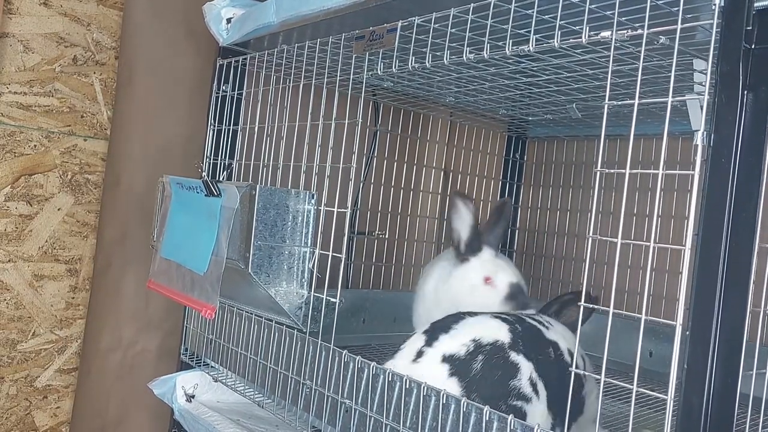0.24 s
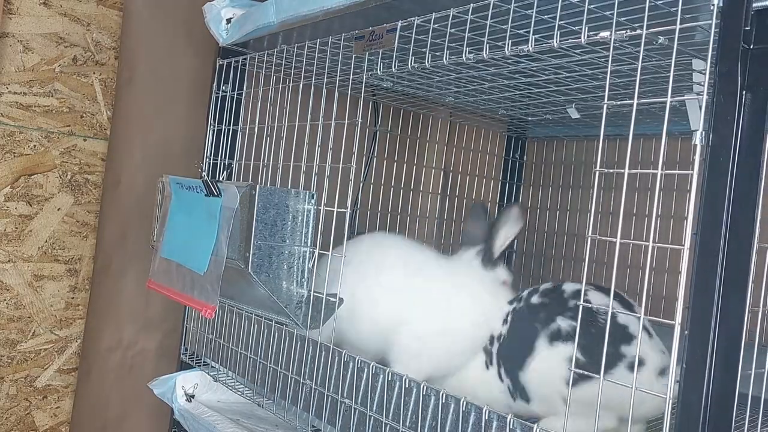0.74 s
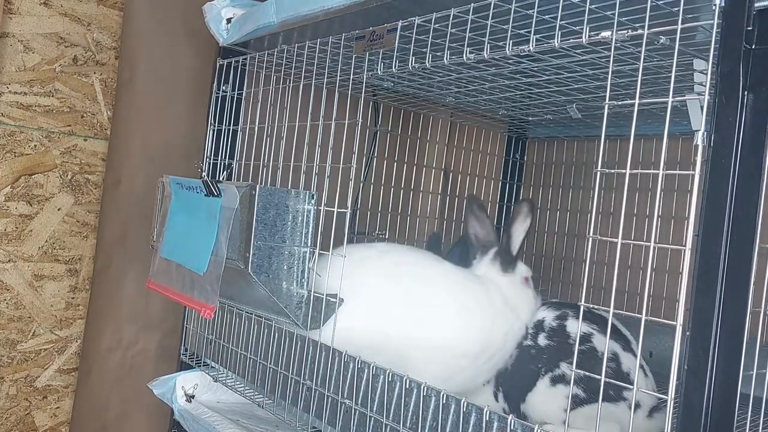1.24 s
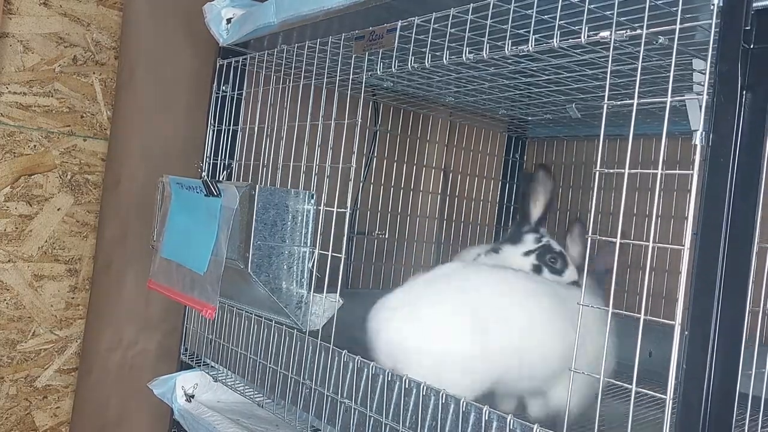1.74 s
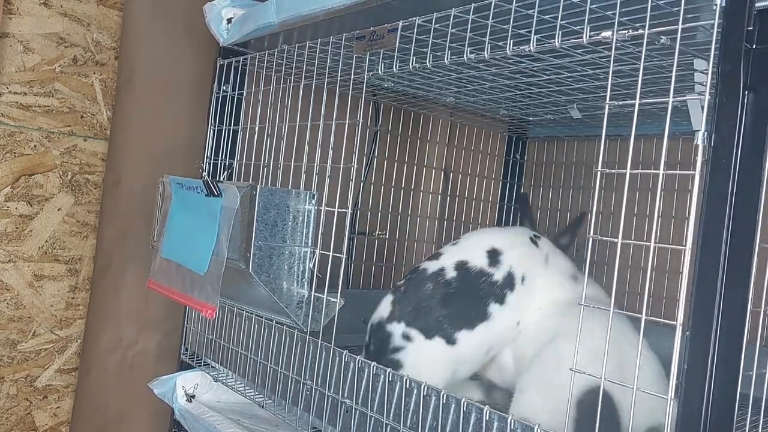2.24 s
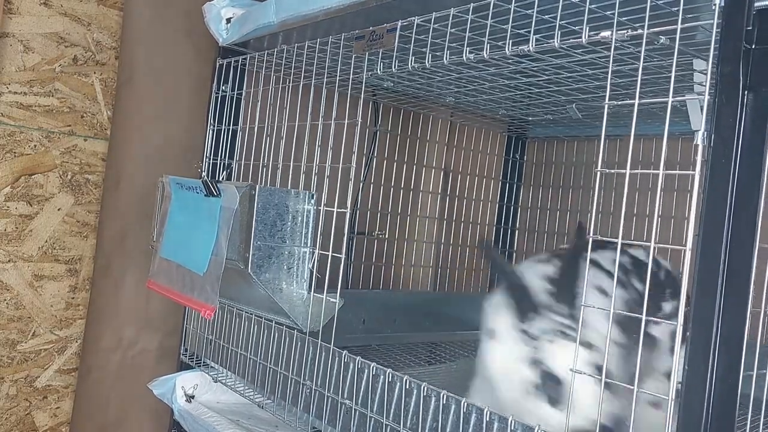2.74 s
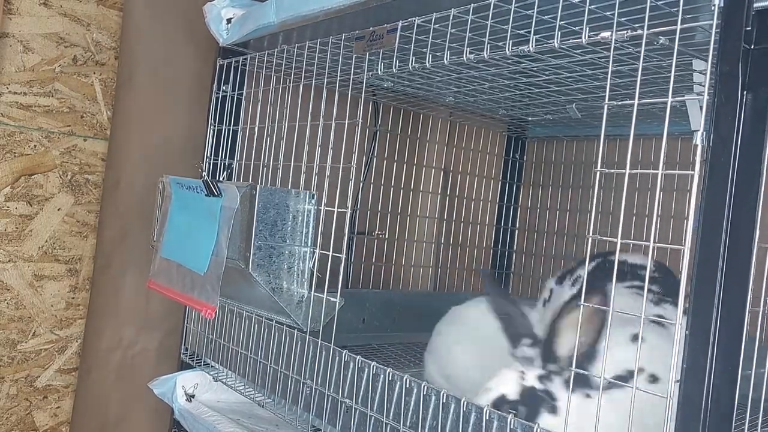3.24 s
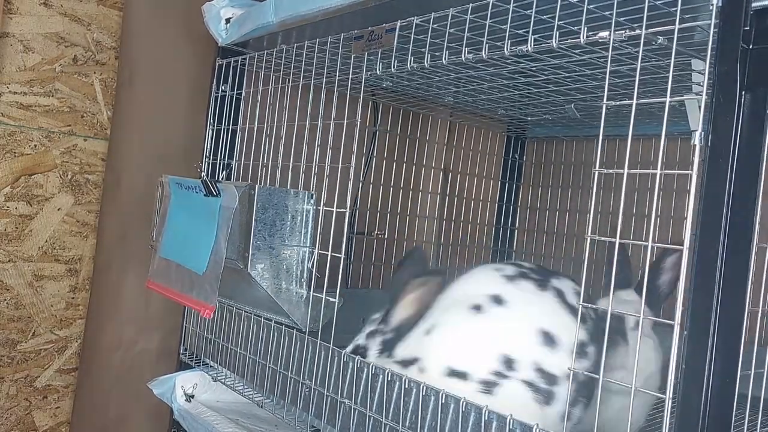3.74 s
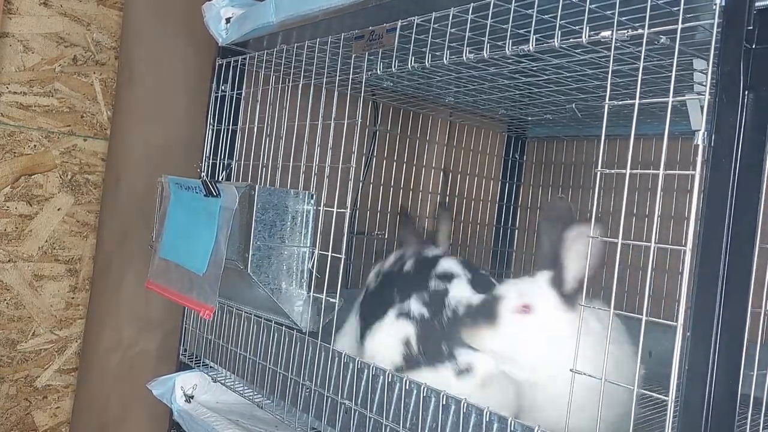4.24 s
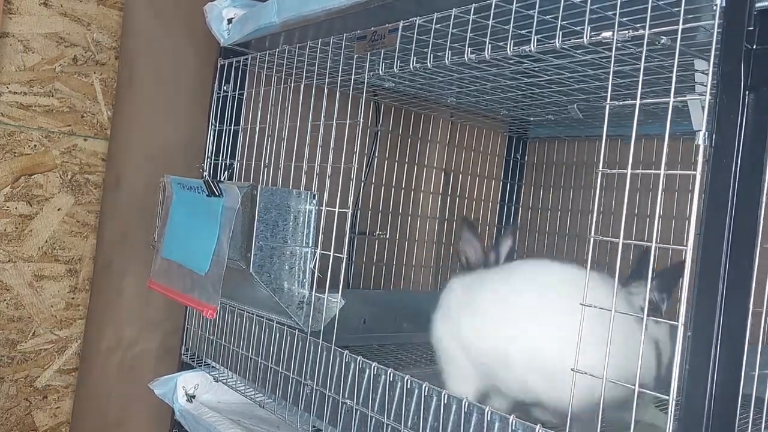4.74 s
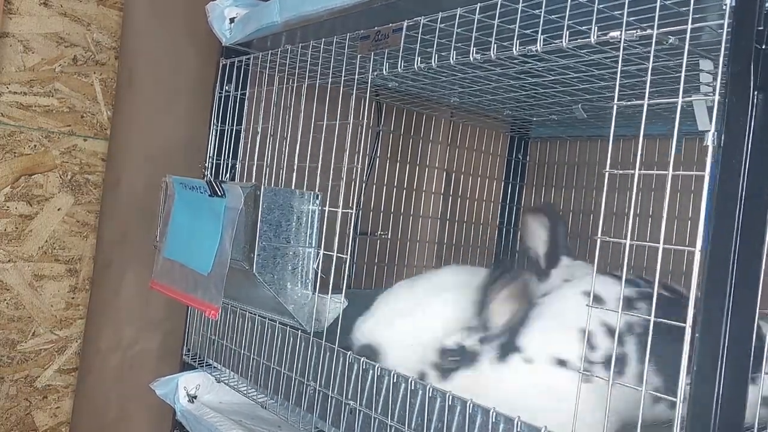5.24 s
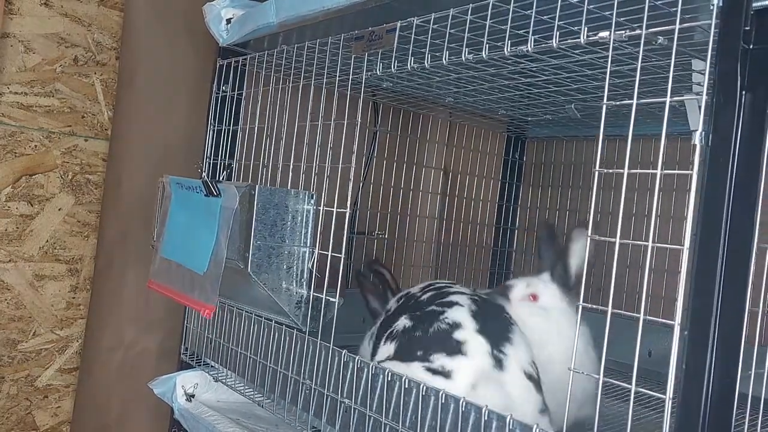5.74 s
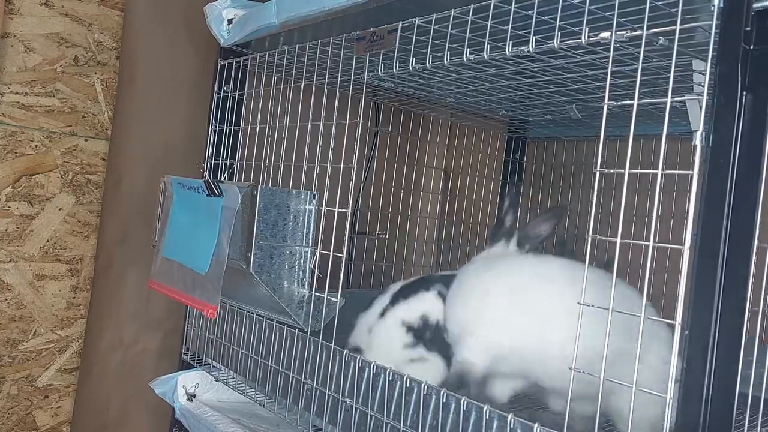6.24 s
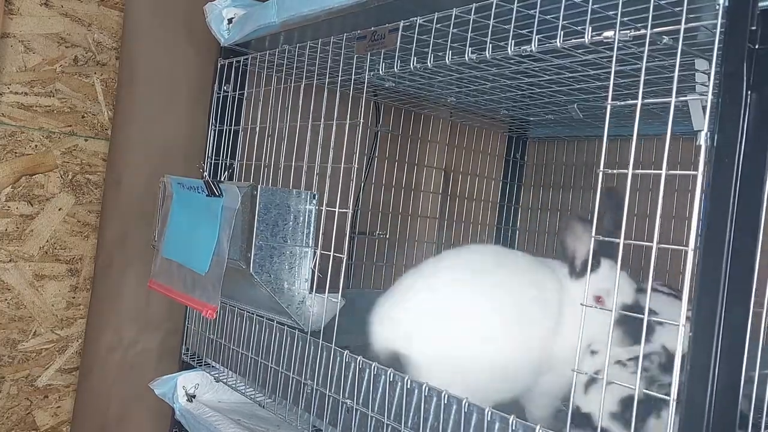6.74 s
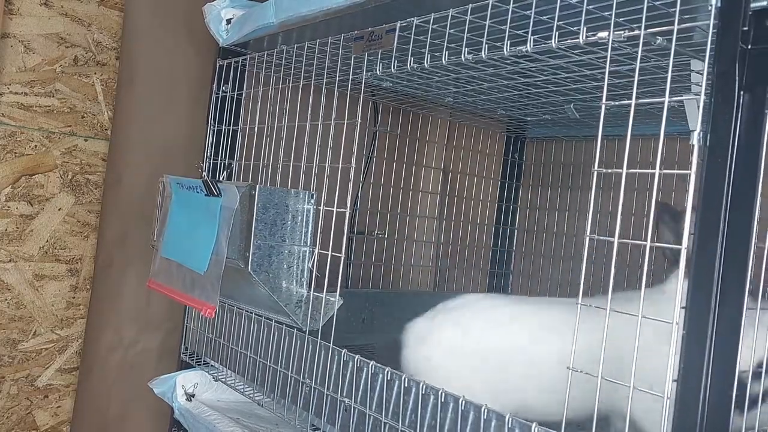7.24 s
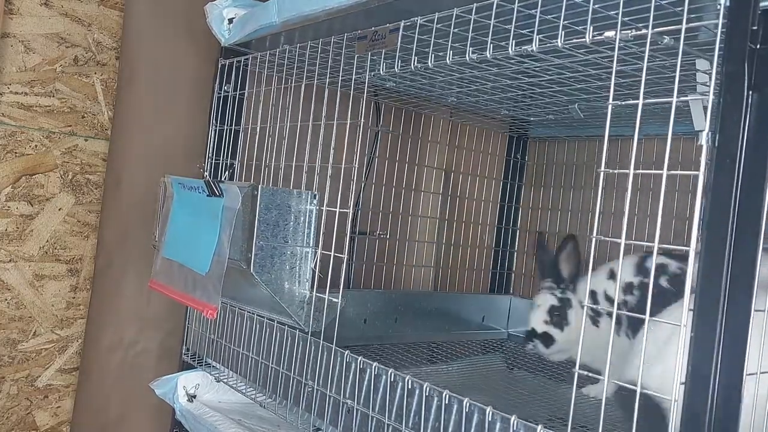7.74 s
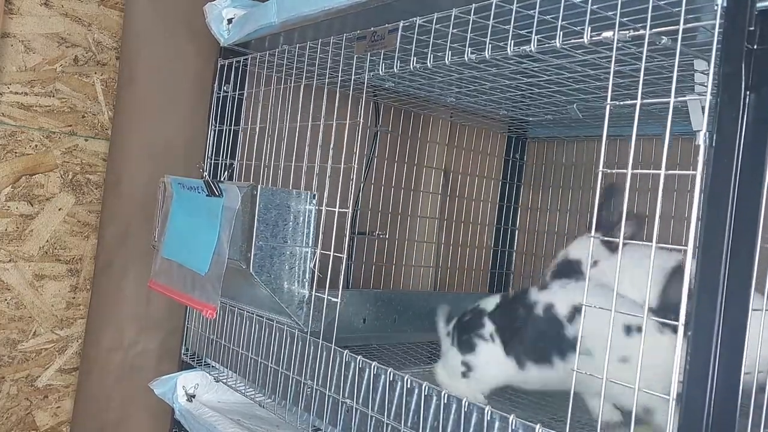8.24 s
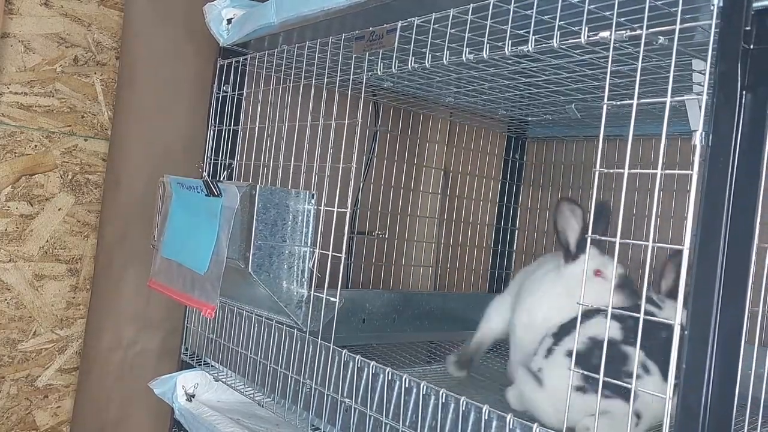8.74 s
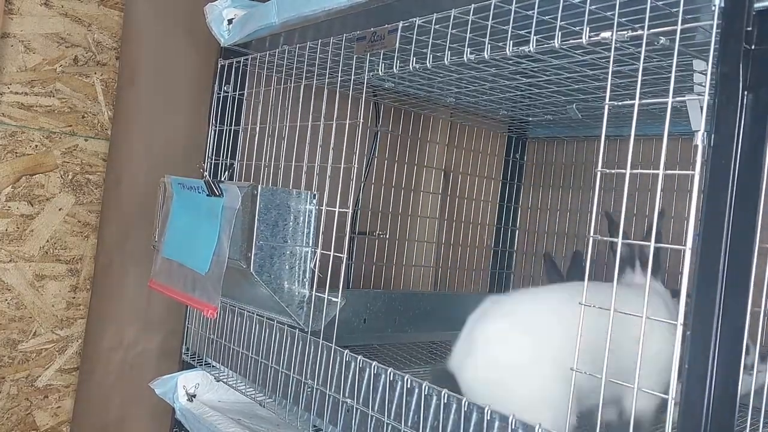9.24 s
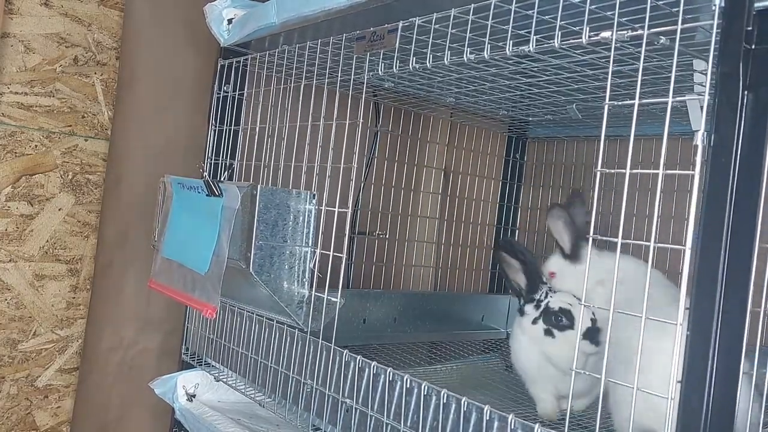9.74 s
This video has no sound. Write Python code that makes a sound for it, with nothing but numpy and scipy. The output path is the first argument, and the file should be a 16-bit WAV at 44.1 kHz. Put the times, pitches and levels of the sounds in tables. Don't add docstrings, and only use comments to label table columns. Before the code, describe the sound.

Two rabbits scuffle in a wire-mesh cage in a wooden shed, picked up close in stereo with short, dull reflections. It opens almost quiet, with faint mains hum, soft air and small knocks near 0.3 s. A bright burst of claw clicks and shaking mesh breaks out at 0.65 s, then more from 1.45 to 2.1 s and a sharp kick at 2.55 s, trailing into lighter rattles around 3 s. From 3.2 to 4.4 s only weaker scrabbles remain. At 4.5 s the chase turns dense, nearly continuous until 6.6 s, with strong jolts at 5.4, 5.65 and 6.45 s and hollow paw booms and tray clatter beneath. It thins near 7 to 7.4 s, snaps back at 7.5 s, knocks and drums around 8.2 to 8.5 s, then rattles on, with crisp bursts at 9.2 and 9.7 s before easing.

```python
import sys
import numpy as np
from scipy import signal
from scipy.fft import rfft, irfft, next_fast_len
from scipy.io import wavfile
from scipy.ndimage import uniform_filter1d

SR = 44100
rng = np.random.default_rng(int(sys.argv[2]) if len(sys.argv) > 2 else 0)


def store_pcm(level_fs):
    pcm = np.round(np.clip(level_fs, -1, 1) * 32767).astype(np.int16)
    wavfile.write(sys.argv[1], SR, np.atleast_2d(pcm).T)


def boost_factor(decibels):
    exponent = np.asarray(decibels, float) / 20
    return 10 ** exponent


N = 440559
SIZE = next_fast_len(N + SR // 2)
HZ = np.maximum(np.arange(SIZE // 2 + 1) * SR / SIZE, 1)

# peak in seconds, claw shower in dB, build-up in seconds, die-away in seconds,
# panel shake in dB above the claws.
CIRCLING = [(0.359, -52, 0.16, 0.45, -3), (0.56, -55, 0.11, 0.27, -4), (0.672, -26, 0.072, 0.36, -6.5),
            (0.85, -35.5, 0.081, 0.27, -8), (1.0, -41.5, 0.93, 0.11, -4.5), (1.15, -67.5, 0.1, 0.3, 2),
            (1.327, -58, 0.026, 0.53, -35), (1.468, -25.5, 0.049, 0.19, -20.5),
            (1.599, -28, 0.12, 0.19, -7), (1.775, -43, 0.05, 0.15, -17), (1.84, -32.5, 0.07, 0.2, -4),
            (1.89, -27, 0.14, 0.31, -10), (1.962, -26, 0.15, 0.31, -5.5), (2.098, -31.5, 0.29, 0.16, -9.5),
            (2.439, -44.5, 0.056, 0.089, -10), (2.544, -24.5, 0.075, 0.49, -6.5),
            (2.66, -28.5, 0.23, 0.16, -11.5), (2.8, -36, 0.41, 0.4, -10), (2.99, -29, 0.26, 0.25, -7),
            (3.238, -55, 0.1, 0.54, -3), (3.337, -49.5, 0.039, 0.23, -5), (3.414, -39, 0.047, 0.41, -7),
            (3.602, -41, 0.034, 0.25, -15), (3.725, -40, 0.4, 0.22, -5.5), (4.057, -52.5, 0.059, 0.19, -18),
            (4.174, -43.5, 0.058, 0.16, -8), (4.252, -44, 0.13, 0.28, -8)]
CHASING = [(3.95, -65, 0.65, 0.5, 0.5), (4.4, -52, 0.1, 0.25, -0.5), (4.497, -23, 0.067, 0.2, -7),
           (4.525, -27, 0.11, 0.16, -11), (4.644, -31.5, 0.18, 0.25, -5), (4.736, -27, 0.032, 0.29, -7.5),
           (4.879, -23, 0.19, 0.23, -6), (5.039, -34, 0.17, 0.73, -8.5), (5.239, -33, 0.14, 0.22, -7),
           (5.347, -29, 0.15, 0.25, -5), (5.42, -22, 0.066, 0.17, -6.5), (5.594, -32, 0.31, 0.52, -5.5),
           (5.669, -21.5, 0.043, 0.32, -7.5), (5.8, -35, 0.18, 0.2, -15), (5.93, -38.5, 0.17, 0.5, -8.5),
           (6.08, -35, 0.15, 0.24, -25), (6.154, -28.5, 0.23, 0.21, -8.5), (6.323, -32.5, 0.054, 0.14, -30),
           (6.49, -22.5, 0.2, 0.2, -8), (6.74, -42, 0.53, 0.35, -8.5), (6.909, -36.5, 0.54, 0.24, -7.5)]
JOSTLING = [(7.075, -51.5, 0.028, 0.94, -19), (7.125, -57.5, 0.036, 0.1, 7), (7.226, -47, 0.069, 0.088, -7),
            (7.291, -48.5, 0.08, 0.11, -4), (7.415, -64, 0.024, 0.06, 6), (7.48, -27, 0.033, 0.18, -32),
            (7.551, -28, 0.13, 0.25, -6), (7.758, -43.5, 0.07, 0.11, -6), (7.84, -57.5, 0.11, 0.28, -0.5),
            (7.953, -36, 0.044, 0.85, -7), (8.107, -39.5, 0.18, 0.31, -5), (8.189, -37.5, 0.068, 0.16, 1.5),
            (8.27, -33.5, 0.044, 0.21, -3.5), (8.367, -26, 0.06, 0.34, -4.5),
            (8.497, -30, 0.58, 0.46, -9.5), (8.877, -31.5, 0.13, 0.28, -7), (8.94, -31, 0.093, 0.36, -12),
            (9.071, -28.5, 0.11, 0.42, -7.5), (9.21, -20, 0.049, 0.18, -9), (9.28, -30, 0.12, 0.089, -17),
            (9.408, -62, 0.05, 0.37, -6), (9.519, -35.5, 0.17, 0.17, -6.5),
            (9.602, -26.5, 0.045, 0.26, -6.5), (9.685, -22, 0.022, 0.21, -8.5),
            (9.86, -44, 0.2, 0.22, -5.5)]
# start in seconds, peak in dB.
KICKS = [(0.6465, -30), (1.4382, -32), (1.5739, -32), (1.8149, -34), (1.9346, -29), (2.0708, -39),
         (2.512, -20), (2.558, -11.5), (2.9513, -27), (3.4103, -29.5), (3.5953, -27), (3.6647, -30.5),
         (4.1336, -36), (4.2374, -35), (4.4469, -28), (4.4778, -21), (4.614, -28), (4.7323, -24),
         (4.8221, -20), (4.8615, -20), (5.0286, -25), (5.3369, -31), (5.4082, -19), (5.4441, -22),
         (5.662, -12.5), (6.04, -32), (6.3177, -25), (6.3895, -22.5), (6.4648, -12.5), (7.473, -25),
         (7.5419, -18.5), (7.7514, -34.5), (7.9265, -40), (8.1814, -32), (8.2523, -34), (8.3525, -37),
         (8.4753, -36), (8.9277, -24), (9.046, -27), (9.1846, -32), (9.5857, -32), (9.6825, -19)]
# start in seconds, peak in dB, fade in seconds.
FLICKS = [(0.632, -22, 0.03), (0.6465, -21, 0.03), (1.4353, -18, 0.03), (1.5749, -20, 0.03),
          (1.8154, -23, 0.03), (1.8658, -21, 0.03), (1.9346, -13, 0.03), (2.0708, -24, 0.03),
          (2.5123, -15, 0.03), (2.5577, -12, 0.04), (2.7298, -23, 0.03), (2.9069, -25, 0.03),
          (2.9513, -18, 0.033), (3.3329, -41, 0.036), (3.3958, -30, 0.03), (3.5958, -25, 0.03),
          (3.6632, -29, 0.03), (4.1336, -39, 0.03), (4.2399, -32, 0.03), (4.4469, -21, 0.03),
          (4.4778, -16, 0.03), (4.6135, -19, 0.037), (4.7323, -13, 0.03), (4.8096, -19, 0.03),
          (4.863, -10, 0.033), (5.0281, -20, 0.03), (5.1997, -25, 0.03), (5.3364, -16, 0.033),
          (5.4077, -15, 0.026), (5.4441, -20, 0.027), (5.5474, -24, 0.03), (5.6651, -10, 0.037),
          (6.1316, -25, 0.03), (6.3122, -25, 0.03), (6.389, -23, 0.03), (6.4204, -21, 0.03),
          (6.4648, -10, 0.03), (6.8839, -27, 0.03), (7.4755, -24, 0.027), (7.5419, -19, 0.03),
          (7.9265, -37, 0.03), (7.9514, -30, 0.03), (8.0916, -27, 0.03), (8.1809, -24, 0.03),
          (8.2523, -28, 0.03), (8.3525, -20, 0.037), (8.4753, -19, 0.03), (8.807, -25, 0.03),
          (8.8579, -25, 0.03), (8.9292, -27, 0.03), (9.046, -23, 0.032), (9.1846, -21, 0.03),
          (9.5034, -31, 0.03), (9.5812, -31, 0.03), (9.6137, -26, 0.03), (9.6825, -10.5, 0.025)]
# frequency in Hz, level in dB per Hz.
WIRE = [(1470, 2.5), (2500, -9), (2640, -6.5), (3980, -4), (5520, -5), (8200, -1), (9440, -4), (11700, 2),
        (14900, 2.5), (15600, 3.5), (16000, -18)]


def claws():
    thin_wire_hz, thin_faster, jolt_s = 10750, 0.91, 0.028
    s, db, build, die, _ = np.transpose(CIRCLING + CHASING + JOSTLING)
    kick_s, kick_db = np.transpose(KICKS)
    flick_s, flick_db, flick_fade = np.transpose(FLICKS)

    scrabble = boost_factor(-3.5) * bursts(s, db, build, die)
    thick_level = np.hypot(scrabble, jolts(kick_s, kick_db - 10.0, jolt_s))
    quick_scrabble = boost_factor(-3.0) * bursts(s, db, build * thin_faster, die * thin_faster)
    thin_level = np.hypot(quick_scrabble, jolts(flick_s, flick_db - 11.5, flick_fade))

    body = colour(WIRE) * np.minimum(HZ / 2500, 1) ** 2 * np.minimum(HZ / 1450, 1) ** 6
    thin = 1 / (1 + (thin_wire_hz / HZ) ** 12)
    thick_wires = thick_level, body * np.sqrt(1 - thin), 650, 1.9
    thin_wires = thin_level, body * np.sqrt(thin), 900, 1.9
    return thick_wires, thin_wires


# frequency in Hz, level in dB per Hz.
PANEL = [(350, -5), (600, -0.5), (783, -6.5), (919, -2), (1250, -5), (1770, 0), (2420, -8), (4010, -7),
         (5000, -15), (6500, -27), (11000, -120)]
# frequency in Hz, width in Hz, level in dB.
MESH = [(880, 44, 3.5), (1250, 79, -30), (1520, 26, -10), (1810, 430, -4), (3320, 120, 6.5),
        (4130, 130, -22)]


def panels():
    lag_s, slower = 0.0072, 1.127
    s, db, build, die, above = np.transpose(CIRCLING + CHASING + JOSTLING)
    level = boost_factor(1.3) * bursts(s + lag_s, db + above, build * slower, die * slower)
    edges = np.minimum(HZ / 600, 1) ** 3 * np.minimum(4500 / HZ, 1) ** 3
    ringing = 1 + boost_factor(-12.0) * np.abs(modes(MESH))
    return level, colour(PANEL) * edges * ringing, 380, 1.5


# peak in seconds, floor boom in dB, die-away in
# seconds, tray clatter in dB above the boom.
HOPS = [(0.292, -51.5, 0.11, 1), (0.712, -37, 0.47, -0.5), (0.968, -42.5, 0.25, -5),
        (1.604, -39.5, 0.25, 1.5), (1.855, -37, 0.82, 0), (2.083, -37.5, 0.18, -2),
        (2.577, -37, 0.54, -1), (2.784, -42, 1, -2.5), (3.01, -41.5, 0.29, 0),
        (3.467, -51, 0.59, -1.5), (3.692, -47, 0.38, 0), (4.253, -47.5, 0.18, -4),
        (4.442, -39.5, 0.037, -4.5), (4.526, -37, 0.76, 0.5), (4.741, -35.5, 0.95, -3),
        (4.91, -38.5, 0.52, 1.5),
        (5.166, -36.5, 0.041, -1), (5.272, -32.5, 0.49, -1.5), (5.483, -36.5, 0.098, 2),
             (5.627, -39, 0.34, 1.5), (5.727, -39, 0.71, 0), (6.16, -42, 0.34, 0), (6.379, -40, 0.51, -3.5),
             (6.512, -40, 0.38, 4), (6.761, -42, 0.34, 1), (6.931, -49, 0.48, 2), (7.194, -58.5, 0.49, 1),
             (7.43, -53.5, 0.12, 2.5), (7.573, -40.5, 0.42, 2), (7.76, -51, 0.21, 1),
             (8.02, -43.5, 0.34, -0.5), (8.233, -35, 0.34, 0.5), (8.406, -37, 0.059, 1.5),
             (8.477, -37, 0.43, 0.5), (8.66, -45, 0.24, -4), (8.882, -41.5, 0.32, 3.5),
             (9.097, -41.5, 0.28, 0.5), (9.26, -36.5, 0.19, 0.5), (9.542, -47, 0.81, 2.5),
             (9.71, -39, 0.32, 0.5), (9.941, -47.5, 0.079, 1)]
# frequency in Hz, width in Hz, level in dB.
FLOOR = [(120.3, 25, -4.5), (190, 31, -5.5), (236, 28.6, 0.5), (301.6, 36, -3.5)]
# frequency in Hz, width in Hz, level in dB.
TRAY = [(366, 39, 2), (517, 150, -4.5), (637, 65, -0.5), (793, 156, -7.5)]


def paws():
    build_s, tray_faster = 0.23, 0.91
    s, db, die, above = np.transpose(HOPS)
    thud = boost_factor(-0.1) * bursts(s, db, build_s, die)
    rattle = boost_factor(-0.26) * bursts(s, db + above, build_s, die * tray_faster)
    floor_body = modes(FLOOR) * np.minimum(400 / HZ, 1)
    tray_body = modes(TRAY) * np.minimum(1200 / HZ, 1) * np.minimum(HZ / 300, 1)
    return (thud, floor_body, 80, 1.2), (rattle, tray_body, 80, 1.5)


# frequency in Hz,
# side minus mid in dB.
SPREAD = [(60, -14), (250, -12.5), (600, -4), (1500, 0), (5500, 1), (7000, -3), (7500, -40), (9500, -30),
          (10500, -17), (16000, -17)]


def cage():
    places = 6
    parts = []
    for level, body, per_s, scatter_db in (*claws(), panels(), *paws()):
        parts.append((level, body / np.sqrt(np.mean(np.abs(body) ** 2)), per_s, scatter_db))

    turns = np.pi * (np.log2(HZ) / 1.5 + np.arange(places)[:, None] / places)
    favour = boost_factor(-8.0) + np.cos(turns) ** 4
    favour /= np.sqrt(np.sum(favour ** 2, axis=0))
    share = boost_factor(np.array([3.84 * walk(18) for _ in range(places)]))
    share /= np.sqrt(np.mean(share ** 2, axis=0))

    mid, side = 0, 0
    for own, near in zip(favour, share):
        spot = 0
        for level, body, per_s, scatter_db in parts:
            contacts = level * near * shower(per_s, scatter_db)
            spot = spot + rfft(contacts, SIZE) * body
        spot = own * spot
        mid = mid + spot * path()
        side = side + spot * path()
    return irfft(np.array([mid, side * colour(SPREAD)]), SIZE)[:, :N]


# start in seconds, peak in dB, pitch in Hz,
# time to fall 60 dB in seconds.
KNOCKS = [(0.231, -45, 716, 0.064), (0.261, -31, 710, 0.062), (0.261, -44, 997, 0.05),
          (0.261, -57, 1580, 0.05), (0.261, -44, 224, 0.13), (0.281, -39, 199, 0.1),
          (0.479, -47.5, 728, 0.11), (0.505, -43, 518, 0.063), (0.661, -33, 193, 0.18),
          (1.59, -29, 247, 0.047), (4.133, -53, 280, 0.15), (4.702, -30, 226, 0.18),
          (4.758, -36, 249, 0.13), (5.233, -31, 306, 0.4), (5.479, -26, 234, 0.18), (6.728, -40, 190, 0.41),
          (6.98, -39, 234, 0.16), (7.124, -38, 236, 0.077), (7.18, -42, 231, 0.18), (7.185, -48, 122, 0.98),
          (7.241, -46, 119, 0.5), (7.408, -43, 510, 0.077), (8.186, -30.5, 232, 0.18),
          (8.229, -25.5, 630, 0.19), (8.389, -29, 670, 0.13), (8.449, -29.5, 241, 0.2),
          (8.549, -28, 713, 0.12), (9.522, -30, 695, 0.11), (9.617, -31.5, 296, 0.084),
          (9.679, -33, 229, 0.57), (9.914, -29.5, 178, 0.11)]


def knocks():
    out, t = np.zeros(N), np.arange(SR // 4) / SR
    slaps = rng.standard_normal((len(KNOCKS), len(t)))
    slaps = uniform_filter1d(uniform_filter1d(slaps, size=18), size=13)
    slaps *= boost_factor(4) * np.exp(-t / .01)
    for (s, db, hz, t60), slap in zip(KNOCKS, slaps):
        i = int(s * SR)
        ring = np.sin(2 * np.pi * hz * t) * np.exp(-np.log(1000) * t / max(t60, .02))
        ring *= np.minimum(t / 0.0034, 1)
        out[i:i + len(t)] += (boost_factor(db - .5) * (ring + slap))[:N - i]
    return out


# start in seconds, level in dB, pitch in Hz,
# length in seconds.
DRONES = [(1.81, -38, 239.6, 0.08), (2.522, -39.5, 301, 0.07), (4.7, -32, 187.5, 0.15),
          (4.87, -33, 229.4, 0.081), (4.95, -34, 244, 0.08), (5.23, -30.5, 228.3, 0.1),
          (6.71, -36, 189.8, 0.1), (6.821, -40.5, 238, 0.07), (6.906, -40.5, 235, 0.045),
          (7.41, -52, 1130, 0.03), (7.97, -41, 530, 0.022), (8.225, -33, 234, 0.06),
          (8.29, -35, 200, 0.052), (8.365, -38, 240, 0.049), (8.53, -39, 238, 0.043),
          (8.82, -42, 233, 0.051)]


def drones():
    out = np.zeros(N)
    for s, db, hz, length in DRONES:
        t = np.arange(int(length * SR)) / SR
        i = int(s * SR)
        swell = np.sqrt(np.sin(np.pi * t / length))
        out[i:i + len(t)] += boost_factor(db) * swell * np.sin(2 * np.pi * hz * t)
    return out


# multiple of the mains frequency, level in dB.
HUM_ORDERS = [(4, -62), (5, -80), (7, -67), (9, -82)]


def hum():
    mains_hz, shaft_hz, waver_db = 59.98, 59.42, 1.2
    in_step_s = .8
    t = np.arange(N) / SR - in_step_s
    mains, shaft = 2 * np.pi * mains_hz * t, 2 * np.pi * shaft_hz * t
    upper = sum(boost_factor(db + 1.5 * walk(4)) * np.sin(k * mains) for k, db in HUM_ORDERS)
    low = boost_factor(-59.5) * np.sin(mains) + boost_factor(-57.5) * np.sin(shaft)
    octave = boost_factor(-62.5) * np.sin(2 * mains) + boost_factor(-69) * np.sin(2 * shaft)
    return np.sqrt(2) * (boost_factor(waver_db * walk(2.7)) * low + boost_factor(waver_db * walk(5)) * octave + upper)


# frequency in Hz, level in dB per Hz.
SHED = [(25, -2), (60, 6.5), (150, -6), (500, -6.5), (800, -19.5), (1700, -20), (2800, -34), (3600, -37),
        (4000, -28), (4500, -45), (7000, -41), (13000, -27), (16000, -22)]


def shed_air():
    width = np.array([np.ones_like(HZ), colour(SPREAD)])
    hush = through(rng.standard_normal((2, N)), colour(SHED) * width)
    return boost_factor(-60.5) * unit(hush)


def shower(per_s, scatter_db):
    out = np.zeros(N)
    when, size, sign = rng.random((3, int(per_s * N / SR)))
    height = boost_factor(-scatter_db * np.log(1 - .99 * size))
    out[(when * N).astype(int)] = height * np.sign(sign - .5)
    return unit(out)


def bursts(when, peak_db, build_s, die_s):
    swing_db = 30
    early_s = 0.0026
    since = np.arange(0, N + 64, 64) / SR + early_s - when[:, None]
    span = np.where(since < 0, np.reshape(build_s, (-1, 1)), die_s[:, None])
    span = np.maximum(span, .01)
    power = boost_factor(peak_db[:, None] - swing_db * np.abs(since) / span) ** 2
    return np.interp(np.arange(N) / 64, np.arange(since.shape[1]), np.sqrt(power.sum(axis=0)))


def jolts(when, peak_db, fade_s):
    env, t = np.zeros(N), np.arange(SR // 5) / SR
    for s, db, fade in np.broadcast(when, peak_db, fade_s):
        i = int(s * SR)
        burst = boost_factor(db) * np.exp(-t / max(fade, .004)) * np.minimum(t / 0.0014, 1)
        env[i:i + len(t)] += burst[:N - i]
    return env


def path():
    t = np.arange(SR // 3) / SR
    early, late = rng.standard_normal((2, len(t)))
    near = early * np.exp(-np.log(1000) * t / 0.044)
    planks = boost_factor(-13) * uniform_filter1d(late, size=7) * np.exp(-np.log(1000) * t / 0.36)
    response = near + planks
    response[0] += 5.0
    response = rfft(response, SIZE)
    return response / np.sqrt(uniform_filter1d(np.abs(response) ** 2, size=900))


def walk(per_s):
    steps = rng.standard_normal(int(N / SR * per_s) + 2)
    return np.interp(np.arange(N) / SR * per_s, np.arange(len(steps)), steps)


def modes(table):
    total = 0
    for k, (f, w, db) in enumerate(table):
        total = total + (-1) ** k * boost_factor(db) * 1j * HZ * w / (f * f - HZ ** 2 + 1j * HZ * w)
    return total


def colour(table):
    hz, db = np.transpose(table)
    return boost_factor(np.interp(np.log(HZ), np.log(hz), db))


def through(x, response):
    return irfft(rfft(x, SIZE) * response, SIZE)[..., :N]


def unit(x):
    return x / np.sqrt(np.mean(x ** 2))


# frequency in Hz, left minus right in dB.
LEAN = [(60, 0), (200, -2), (700, -2), (1500, -0.5), (4400, -2.5), (7000, 0.0), (9700, 0.0), (10500, -4.5),
        (15000, -5.5)]


def scene():
    shed_paths = np.array([1 + boost_factor(-15) * path(), boost_factor(-4) * path() * colour(SPREAD)])
    blows = through(knocks() + drones(), shed_paths)
    motor = hum()
    motor = np.array([motor, boost_factor(-14.5) * np.roll(motor, shift=150)])
    mid, side = cage() + blows + shed_air() + motor
    lean = np.sqrt(colour(LEAN))
    return through(np.array([mid + side, mid - side]), np.array([lean, 1 / lean]))


# frequency in Hz, share of narrow bands lost in dB.
DROPOUTS = [(3000, -80), (6300, -42), (7200, -19), (8000, -29), (10500, -32), (11500, -48), (16000, -60)]


def starve(x):
    hz, _, frames = signal.stft(x, SR, nperseg=1024)
    band = np.arange(len(hz)) // 11
    block = np.arange(frames.shape[-1]) // 3
    chance = rng.random((2, band[-1] + 1, block[-1] + 1))[:, band][..., block]
    centre = (band + .5) * 11 * hz[1]
    lost = chance[0] < boost_factor(np.interp(centre, *np.transpose(DROPOUTS)))[:, None]
    wobble = boost_factor(6.0 * (chance[1] - .5) * np.minimum(hz / 3000, 1)[:, None])
    return signal.istft(frames * np.where(lost, boost_factor(-35), wobble), SR, nperseg=1024)[1][:, :N]


def low_pass(x):
    return signal.sosfilt(signal.butter(12, 16970, fs=SR, output="sos"), x)


def record(dry):
    bass_cut = signal.butter(2, 45, "high", fs=SR, output="sos")
    top_cut = signal.ellip(10, .5, 60, 15850, fs=SR, output="sos")
    thin = signal.sosfilt(bass_cut, dry)
    mix = starve(signal.sosfilt(top_cut, thin))
    return low_pass(mix)


dry = scene()
out = record(dry)
store_pcm(out)
```